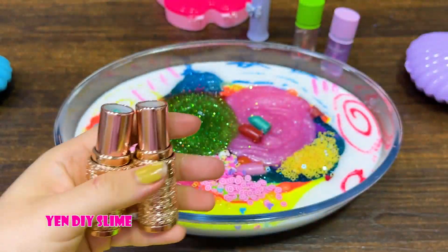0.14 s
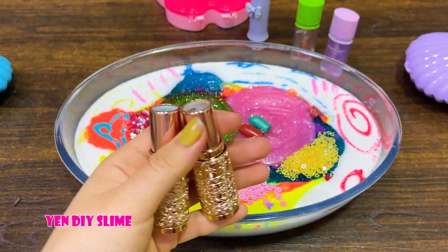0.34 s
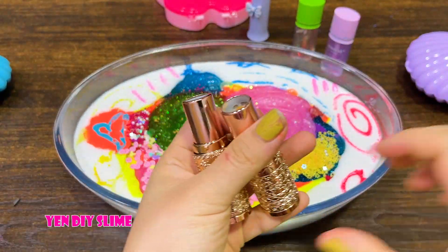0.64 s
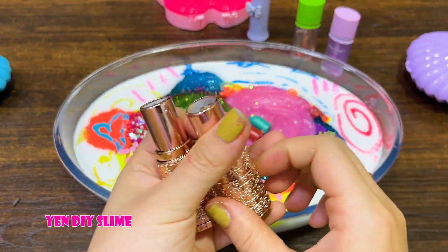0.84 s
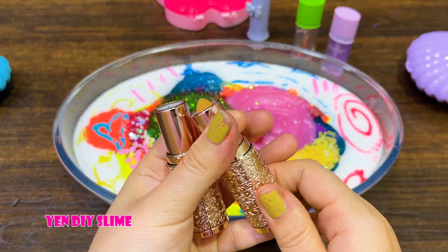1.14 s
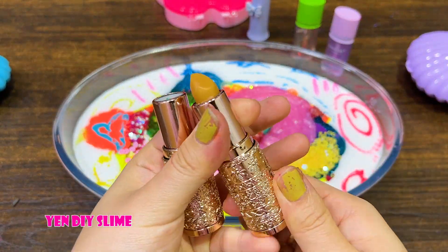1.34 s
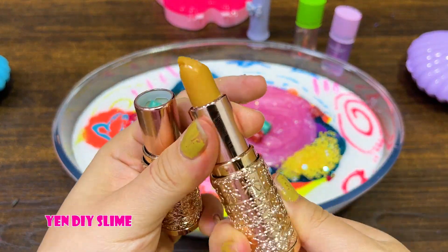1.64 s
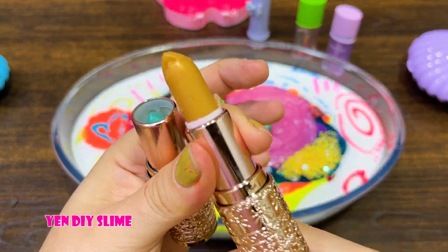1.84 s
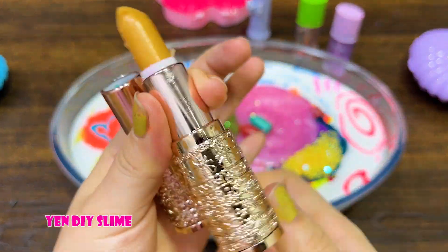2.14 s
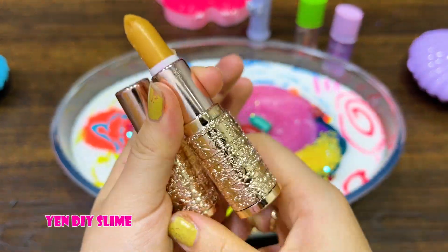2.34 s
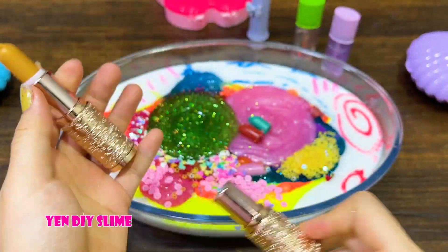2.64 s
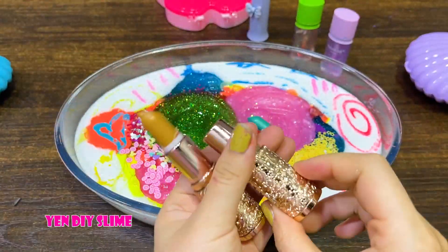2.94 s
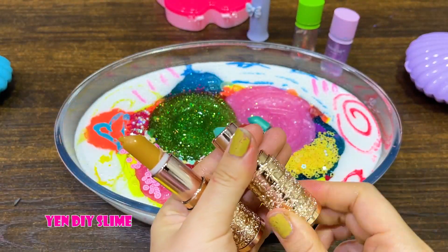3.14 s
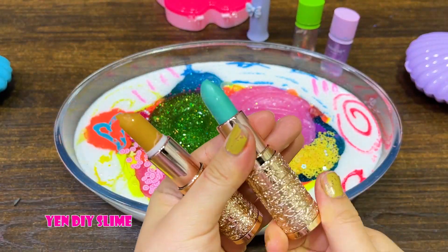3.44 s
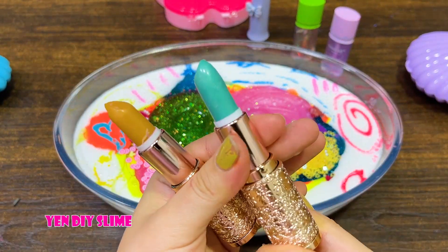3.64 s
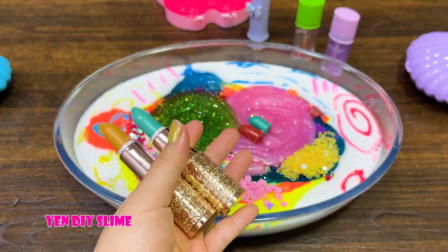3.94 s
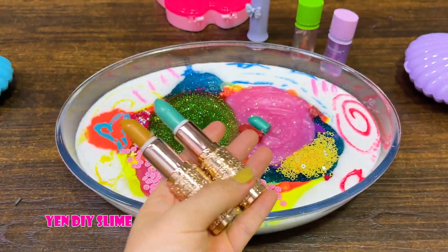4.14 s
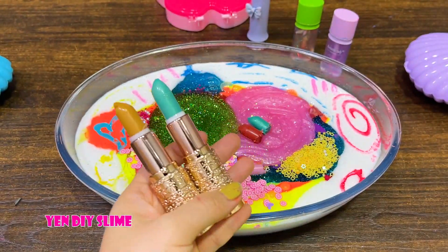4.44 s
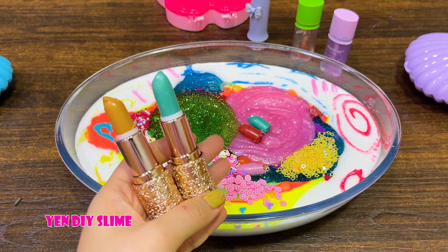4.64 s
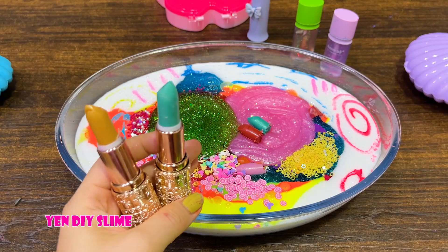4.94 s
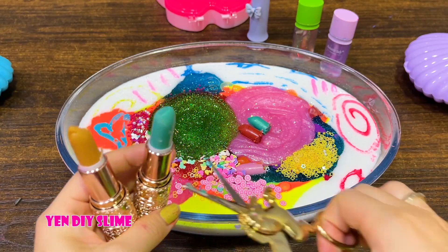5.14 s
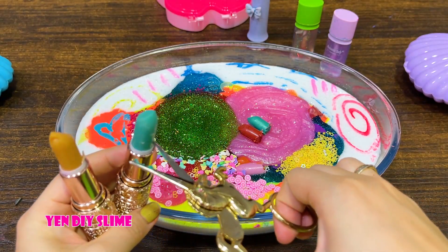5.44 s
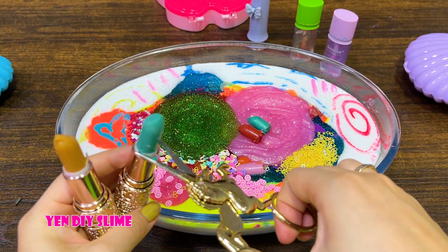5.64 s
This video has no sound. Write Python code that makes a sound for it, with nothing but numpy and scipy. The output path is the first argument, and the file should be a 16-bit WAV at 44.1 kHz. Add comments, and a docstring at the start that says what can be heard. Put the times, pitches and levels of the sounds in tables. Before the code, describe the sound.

Two metal lipstick cases knock together hard at once, then a cap clacks and rattles to rest on the table. Light ticks follow, a sleeve snaps, soft hissing twists and small clicks continue, then a burst of firmer ticks and a loud table bump. Scissor blades chatter briefly near the end. Close stereo microphone, small room, low fan hum with faint distant thumps.

```python
"""Lipstick tubes in the hands

Two metal lipstick tubes knock, clack, tick and rub close to a stereo microphone in a small room.
Each touch mixes fading tones, for the ringing metal, with short noise bursts, for the contact.
Sleeves snap with a sharp pulse and hiss as narrow bands of noise; scissors chatter on the table.
Behind them a fan (noise and two low tones) hums, and dull noise thumps repeat in threes far away."""
import sys
import numpy as np
from scipy import signal
from scipy.fft import rfft, irfft, next_fast_len
from scipy.io import wavfile
from scipy.ndimage import uniform_filter1d

SR = 44100
rng = np.random.default_rng(int(sys.argv[2]) if len(sys.argv) > 2 else 0)


def put_to_file(sound):
    """Save the sound as 16-bit audio at rate SR, in the file named by the first command-line argument."""
    columns = np.atleast_2d(sound).T  # one column per channel
    safe = np.clip(columns, -1, 1)
    whole_steps = np.round(safe * 32767)
    wavfile.write(sys.argv[1], SR, whole_steps.astype(np.int16))


N = 255780  # length of the scene in samples
T = np.arange(SR // 2) / SR  # time since a blow, in s
HZ = np.fft.rfftfreq(len(T), 1 / SR)  # the frequencies of such a short sound

# All levels are relative: each sound's function mixes and scales them.
# colour of the fan's rush, the steady hiss and its narrow high band: (f/Hz, level/dB)
AIR = [(42, -26.5), (58, -3.5), (110, -10.5), (200, -14.5), (450, -8), (510, -12.5), (630, 1.5),
       (740, -0.5), (870, -14.5), (1050, -33), (1500, -38), (5000, -61.5)]
HISS = [(100, 10), (900, 14), (1500, -0.5), (5500, -5), (14000, -5), (15500, -8), (16100, -28.5)]
WHINE = [(3000, -30), (6700, -21), (7500, -5), (8000, 1.5), (8500, -9), (10000, -26.5), (14000, -41)]
# steady tones of the fan: (f/Hz, level/dB)
HUM = [(156, -10.5), (313, -17)]
# the fan and far thumps are steady but for one dip, in which they keep sinking
FAN_DB, DIP_DB, DIP_SINK_DB_PER_S = -53.5, -6.5, -4.5
DIP_START_S, DIP_FALL_S, DIP_END_S, DIP_RETURN_S = 0.31, 0.051, 2.373, 0.29
# one group of far thumps: (delay/s, level/dB)
THUMP_GROUP = [(0, 5.5), (.092, 7), (.238, 4.5)]
FIRST_GROUP_S, GROUP_PERIOD_S = 1.583, 1.095
# colour of a far thump, also used for the boom under the cap: (f/Hz, level/dB)
FAR = [(30, -26), (80, -13.5), (150, -6), (228, 1), (275, -9.5), (330, -4.5), (500, -15), (1000, -25),
       (3000, -75.5)]

# how long the room's echo takes to fall by 60 dB: (f/Hz, t60/s)
ROOM_T60 = [(200, 0.58), (1000, 0.12), (2800, 0.2), (7000, 0.23), (15000, 0.17)]
# colour of the echo: (f/Hz, level/dB)
ROOM_TONE = [(200, -5), (600, -1.5), (1100, 4.5), (2200, 3), (4000, -2), (5000, -2.5), (8000, 2),
             (11000, 1.5), (15000, -2.5)]
# how alike left and right are in sound from all around: (f/Hz, likeness from -1 to 1)
ALIKE = [(100, 0.85), (700, .6), (1500, 0.32), (5000, 0.1), (9000, .6), (12500, 0.91)]
# how far the left microphone port leads the right: (f/Hz, phase/rad)
PORTS = [(300, -.3), (1200, -.5), (2200, .5), (3800, 1.25), (5800, .55), (7800, .75), (10000, .9),
         (11300, 0), (13350, -3.14), (15400, -6.28)]
TOP_HZ = 16250  # upper edge of the microphone

# metal bumps on the table: (t/s, crack level/dB, board level/dB)
BUMPS = [(4.4279, -34.5, -32.5), (4.468, -46.5, -41.5), (4.522, -57, -39), (4.595, -14.5, -24.5)]
# metal drags on the table, case slips on case: (start/s, end/s, gap/s)
DRAG_RUN = (4.44, 4.565, 0.012)
SLIP_RUN = (0.526, .69, 0.012)
DRAG_DB, SLIP_DB, RUN_FADE_DB_PER_S = -48.5, -51.5, -51  # levels at the start of a run, and their slope
SLIP_SCATTER_S, SLIP_SCATTER_DB, SLIP_RING_DB = 0.005, 4, 0

# scissor blades chatter: (t/s, level/dB)
SNIPS = [(5.1793, -25.5), (5.182, -30.5), (5.187, -33.5)]
# a sleeve hisses as it turns: (middle t/s, half length/s, level/dB)
TWISTS = [(1.272, 0.42, -75), (1.74, 0.17, -66.5), (2.189, 0.052, -61), (3.448, 0.57, -73.5)]
TWIST_HZ, TWIST_OCTAVES, RUB_OCTAVES = 13560, 0.24, .32  # octaves from the centre to half strength
# fingers and metal slide: (middle t/s, half length/s, level/dB, centre f/Hz)
RUBS = [(0.378, 0.069, -71, 5000), (2.225, 0.064, -76, 5200), (3.44, 0.13, -74, 5630),
        (3.858, 0.072, -72.5, 1725), (4.701, 0.069, -55.5, 4680), (4.95, 0.08, -72, 1814)]
# case touches case: (t/s, level/dB, ring level/dB)
TICKS = [(.3476, -46, -19), (.358, -40.5, -19), (.5475, -41, -5.5), (.5675, -38.5, -8), (.6075, -41, -3),
         (.6752, -47.5, -5), (.6952, -46, -3), (.7022, -45.5, 3), (.8624, -36, -12), (.8744, -38, -16),
         (1.6246, -44.5, -10), (2.365, -40, -22), (2.3835, -39.5, 4), (2.3875, -33.5, 1),
         (2.7646, -44, -12.5), (3.0979, -39, 4), (4.0803, -20, 1), (4.0888, -29, -1), (4.0924, -38, 3),
         (4.099, -22, -17), (4.1163, -21.5, -1), (4.1232, -34, 6), (4.374, -49.5, -9), (4.698, -28, -21),
         (4.785, -44.5, -14)]
TICK_PAN_DB, PAN_PER_RING_DB = 10.5, 0.67  # the tube's ring radiates to the left
# a sleeve snaps as it is twisted: (t/s, level/dB, upper edge f/Hz)
SNAPS = [(1.4148, -29, 16000), (1.525, -41, 2580), (1.982, -46, 2200), (2.324, -44.5, 9000)]
# a cap clacks and rattles to rest: (t/s, level/dB, ring tilt/dB per octave, room level/dB)
CLACKS = [(0.4187, -14.5, 1.5, -8.5), (0.4254, -12.5, 2, -9), (0.4322, -18.5, -0.5, -8.5),
          (0.4388, -18.5, 0.5, -8.5), (0.4441, -22, 1.5, -6.5), (.4635, -29.5, -2.5, -6)]
CAP_BOOM_DB = -43  # the table booms under the cap
# clear after-ring of the cap's modes below the top frequency
CAP_SING_DB, CAP_SING_T60, CAP_SING_TOP_HZ = -5, 0.12, 9000
# the cases knock together: (t/s, level/dB, low thud level/dB)
KNOCKS = [(0.011, -10.5, -14.5), (0.0215, -12, -11.5), (0.0233, -11.5, -2.5), (0.0308, -21.5, -8.5),
          (0.0376, -19.5, -11), (0.0437, -27, -4)]

# tones at which the scissors, tube, cap and cases ring: (f/Hz, level/dB, t60/s)
BLADES = [(2845, -19.5, 0.018), (4440, -28, 0.097), (7940, -15, 0.018), (11800, -10, 0.023),
          (14366, 2.5, 0.037)]
TUBE = [(5380, 0, .009), (6820, 1, .0085), (9880, -14, .006), (14400, -6, .006)]
CAP = [(1696, -5, 0.028), (2020, -8, 0.02), (2222, 0.5, 0.025), (2595, -3, 0.022), (2854, -4.5, 0.022),
       (3115, -1.5, .026), (3560, -4.5, .02), (3880, 0, 0.023), (4317, -9.5, 0.019), (6183, -13.5, .02),
       (7967, -11.5, 0.016), (10730, -9.5, .014)]
CASES = [(1047, -5, 0.0063), (1606, -2.5, 0.013), (2450, -9.5, 0.008), (4208, -5, 0.009), (6000, -13, .012),
         (10600, -4, 0.028), (12440, -5, 0.0053), (14570, 1, 0.006)]
# colour of the table board, a sleeve's snap, a bare metal contact and a near thud: (f/Hz, level/dB)
TABLE = [(250, -12.5), (590, 12), (1050, -6), (1800, 5), (3000, 3), (5500, 1), (14000, -49)]
SNAP = [(600, -15), (2200, -9.5), (3300, 4.5), (5600, 4.5), (7500, -9.5), (11000, -8.5), (15000, 0.5)]
CRACK = [(100, -21.5), (550, 6), (1100, -11.5), (2200, -5.5), (4200, -3), (5600, 2), (8000, 2.5),
         (11500, 0.5), (14500, 9.5), (16500, -5)]
THUD = [(100, -7), (300, -0.5), (480, 0.5), (750, -5.5), (1200, -22), (4000, -72.5)]


def amp(db):
    """Turn decibels into a multiplier."""
    return 10 ** (np.asarray(db) / 20)


def unit(x):
    """Scale a sound to an average strength (rms) of 1."""
    return x / np.sqrt(np.mean(x ** 2) + 1e-20)


def blow(x):
    """Scale a short sound to the energy of one millisecond at rms 1."""
    return x / np.sqrt(np.sum(x ** 2) * 1000 / SR + 1e-20)


def along(points, hz):
    """Read a curve of (frequency, value) points on a log frequency axis."""
    f, v = np.transpose(points)
    return np.interp(np.log(hz + 1), np.log(f + 1), v)


def filtered(x, response):
    """Multiply each frequency of x by a given response."""
    n = x.shape[-1]
    m = next_fast_len(n + SR // 8)  # spare room, so the end does not wrap onto the start
    return irfft(rfft(x, m) * response(np.fft.rfftfreq(m, 1 / SR)), m)[..., :n]


def above(x, low_hz):
    """Weaken what lies below low_hz."""
    return signal.sosfilt(signal.butter(3, low_hz, "highpass", fs=SR, output="sos"), x)


def below(x, top_hz):
    """Weaken what lies above top_hz."""
    return signal.sosfilt(signal.butter(3, min(top_hz, .45 * SR), fs=SR, output="sos"), x)


def noise(spectrum, size):
    """Coloured noise of rms 1."""
    return unit(filtered(rng.standard_normal(size), lambda hz: amp(along(spectrum, hz))))


def diffuse(spectrum, size):
    """Stereo noise from all around, its left-right likeness changing with frequency."""
    def likeness(hz):
        return np.clip(along(ALIKE, hz), -1, 1)

    mid = filtered(noise(spectrum, size), lambda hz: np.sqrt(1 + likeness(hz)))
    side = filtered(noise(spectrum, size), lambda hz: np.sqrt(1 - likeness(hz)))
    return unit(np.array([mid + side, mid - side]))


def fade(t60, attack=0.0001):
    """A blow's rise and fall: it drops 60 dB every t60 seconds; attack (s) sets the rise."""
    return amp(-60 * T / t60) * (1 - np.exp(-T / attack))


def causal(gain):
    """The response with this gain that never sounds before its cause."""
    cepstrum = irfft(np.log(gain))
    return np.exp(rfft(2 * cepstrum[:len(T) // 2], len(T)))


def click(spectrum):
    """One clean, sudden pulse with the given spectrum."""
    return blow(irfft(causal(amp(along(spectrum, HZ)))))


def burst(spectrum, t60, tilt_db=0):
    """A dying noise burst that keeps evenly to its spectrum, tilted per octave above 1500 Hz."""
    raw = rfft(rng.standard_normal(len(T)) * fade(t60))
    ripple = np.sqrt(uniform_filter1d(np.abs(raw) ** 2, size=300))
    colour = amp(along(spectrum, HZ) + tilt_db * np.log2(np.maximum(HZ, 1500)))
    return blow(irfft(raw * causal(colour / ripple)))


def crack(t60, tilt_db=0, low_hz=300):
    """The broad burst of a metal contact; a light part gives off little below low_hz."""
    return blow(above(burst(CRACK, t60, tilt_db), low_hz))


def ring(modes, spread=.05, count=8):
    """Each resonance is one partial or a cluster of close ones, detuned at random by spread."""
    hz, db, t60 = np.transpose(modes)
    detune, phase = rng.standard_normal((2, count, len(hz), 1))
    t = T[T < 2 * t60.max()]
    partials = np.sin(2 * np.pi * (hz[:, None] * (1 + spread * detune) * t + phase)).sum(0)
    sound = np.zeros(len(t))
    for x, level, life in zip(partials, db, t60):
        # a longer-lived mode also carries more energy
        sound += amp(level) * blow(x * fade(life)[:len(t)]) * np.sqrt(life)
    return blow(np.pad(sound, (0, len(T) - len(t))))


def slips(start, end, gap, db):
    """An uneven, fading run of small contacts: rows of (t/s, level/dB)."""
    times = np.arange(start, end, gap)
    chance = rng.standard_normal((len(times), 2))
    rows = []
    for s, (late, hard) in zip(times, chance):
        level_db = db + RUN_FADE_DB_PER_S * (s - start) + SLIP_SCATTER_DB * hard
        rows.append((s + SLIP_SCATTER_S * late, level_db))
    return rows


def slide(half_length, centre_hz, octaves):
    """A swell of tiny slips in one band, catching and letting go every few milliseconds."""
    size = int(2 * half_length * SR)
    grip = unit(filtered(rng.standard_normal(size), lambda hz: hz < 200))
    friction = rng.standard_normal(size) * amp(3.5 * np.minimum(grip, 2))
    band = filtered(friction, lambda hz: 1 / (1 + (np.log2((hz + 1) / centre_hz) / octaves) ** 2))
    return unit(band) * np.hanning(size) ** 2


def room(x, room_db, pan_db=0):
    """Direct sound, quick echoes off near surfaces, and a tail that builds up as the walls answer."""
    hz, t, z = signal.stft(diffuse([(100, 0)], len(T)), SR, nperseg=256)
    decay = amp(-60 * t / along(ROOM_T60, hz)[:, None])
    tail = signal.istft(z * decay, SR, nperseg=256)[1][:, :len(T)]
    tail = tail * (1 - np.exp(-T / .009))
    tail = filtered(tail / np.linalg.norm(tail[0]), lambda hz: amp(along(ROOM_TONE, hz)))
    # small surfaces return mostly treble
    near = above(diffuse([(100, 0)], len(T)) * fade(t60=.005), low_hz=1900)
    near = near / np.linalg.norm(near, axis=1, keepdims=True)
    echoes = amp(room_db) * tail + amp(-10.5) * near
    direct = x * amp([[pan_db / 2], [-pan_db / 2]])  # positive pan leans left
    return direct + signal.fftconvolve(x[None], echoes, axes=1)[:, :len(T)]


def add(out, s, x):
    """Mix x in at time s."""
    start = max(round(s * SR), 0)
    part = x[..., :N - start]
    out[:, start:start + part.shape[-1]] += part


def far_thumps():
    """The same three short, low booms return at a steady pace."""
    out = np.zeros((2, N))
    for s in np.arange(FIRST_GROUP_S, N / SR - THUMP_GROUP[-1][0], GROUP_PERIOD_S):
        for delay, db in THUMP_GROUP:
            add(out, s + delay, amp(db + 3) * diffuse(FAR, len(T)) * fade(t60=0.4, attack=0.0098))
    return out


def background():
    """The fan's rush and hum and the far thumps dip together, over a steady hiss with a high band."""
    t = np.arange(N) / SR
    # slow wander in the hum's pitch
    drift = np.cumsum(filtered(rng.standard_normal(N), lambda hz: hz < 4)) / SR
    hum = sum(amp(db) * np.sqrt(2) * np.sin(2 * np.pi * hz * (t + .6 * drift)) for hz, db in HUM)
    fan = amp(1.5) * diffuse(AIR, N) + hum
    falling = (t - DIP_START_S) / DIP_FALL_S
    returning = (DIP_END_S - t) / DIP_RETURN_S
    dip = np.clip(np.minimum(falling, returning), 0, 1)
    level_db = FAN_DB + dip * (DIP_DB + DIP_SINK_DB_PER_S * (t - DIP_START_S))
    hiss = amp(-69.5) * diffuse(HISS, N) + amp(-72.5) * noise(WHINE, N)
    return amp(level_db) * (fan + far_thumps()) + hiss


def table():
    """Metal bumps on and drags across the table: sharp cracks on the bumps, a duller board for both."""
    def board():
        return room(burst(TABLE, t60=0.033), room_db=0.0)

    out = np.zeros((2, N))
    for s, crack_db, board_db in BUMPS:
        metal = room(crack(t60=0.0055, tilt_db=-0.5, low_hz=1830), room_db=-7.5, pan_db=2.0)
        add(out, s, amp(crack_db) * metal + amp(board_db) * board())
    for s, db in slips(*DRAG_RUN, DRAG_DB):
        add(out, s, amp(db) * board())
    return out


def scissors():
    """The blades chatter with a very high, short ring."""
    out = np.zeros((2, N))
    for s, db in SNIPS:
        contact = amp(-15.5) * crack(t60=0.031, low_hz=2500)
        add(out, s, amp(db) * room(ring(BLADES, spread=0.034) + contact, room_db=-14.0))
    return out


def rubs():
    """Turning sleeves all hiss in the same high band; fingers and metal rub lower."""
    out = np.zeros((2, N))
    for s, half_length, db in TWISTS:
        add(out, s - half_length, amp(db) * slide(half_length, TWIST_HZ, TWIST_OCTAVES))
    for s, half_length, db, centre_hz in RUBS:
        add(out, s - half_length, amp(db) * slide(half_length, centre_hz, RUB_OCTAVES))
    return out


def ticks(contacts):
    """Light contacts ring the hand-damped tube; firmer ones are brighter and wake the case's low modes."""
    out = np.zeros((2, N))
    for s, db, ring_db in contacts:
        force_db = db + 20.0
        contact = crack(t60=0.0058, tilt_db=3.5 + .06 * force_db, low_hz=1500)
        tick = blow(amp(ring_db + 6.0) * ring(TUBE, spread=0.024) + contact)
        body = amp(-13.5 + 0.49 * force_db) * blow(below(ring(CASES, spread=.25), top_hz=2200))
        pan_db = TICK_PAN_DB + PAN_PER_RING_DB * ring_db
        both = room(tick, room_db=-11.5, pan_db=pan_db) + room(body, room_db=-6.0)
        add(out, s, amp(db - 7.0) * both)
    return out


def snaps():
    """A sleeve lets go in a dry pulse and a bright crack in the room; soft ones have less treble."""
    out = np.zeros((2, N))
    for s, db, top_hz in SNAPS:
        pulse = room(click(SNAP), room_db=-13.5, pan_db=2.5)
        bright = room(crack(t60=0.004, tilt_db=3, low_hz=3020), room_db=-6)
        add(out, s, amp(db) * below(pulse + amp(-4) * bright, top_hz))
    return out


def caps():
    """A loose cap clacks and rattles, its modes sing on, and the table booms under it."""
    out = np.zeros((2, N))
    for s, db, tilt_db, room_db in CLACKS:
        modes = [(hz, level + tilt_db * np.log2(hz / CAP[0][0]), t60) for hz, level, t60 in CAP]
        lower = [(hz, level, CAP_SING_T60) for hz, level, _ in modes if hz < CAP_SING_TOP_HZ]
        singing = amp(CAP_SING_DB) * ring(lower, spread=0, count=1)
        rattle = below(crack(t60=0.05, tilt_db=-6.5, low_hz=1711), top_hz=3800)
        contact = amp(-7.5) * crack(t60=0.013) + amp(-10) * rattle
        add(out, s, amp(db) * room(ring(modes, spread=0.028) + singing + contact, room_db))
    boom = diffuse(FAR, len(T)) * fade(t60=0.51, attack=0.00359)
    add(out, CLACKS[1][0], amp(CAP_BOOM_DB) * boom)  # starts with the second clack
    return out


def knocks():
    """Hard knocks of the cases, with a thud from the weight behind them."""
    out = np.zeros((2, N))
    for s, db, thud_db in KNOCKS:
        metal = amp(-0.5) * ring(CASES, spread=.055) + amp(-4.0) * crack(t60=.016)
        thud = above(burst(THUD, t60=0.018), low_hz=80)
        add(out, s, amp(db) * room(metal + amp(thud_db) * thud, room_db=-14.5, pan_db=1.5))
    return out


def scene():
    """Everything the hands do, over the room's background."""
    case_slips = [(s, db, SLIP_RING_DB) for s, db in slips(*SLIP_RUN, SLIP_DB)]
    hands = table() + scissors() + rubs() + ticks(TICKS) + ticks(case_slips)
    return background() + hands + snaps() + caps() + knocks()


def record(dry):
    """Two microphone ports differ in phase; hard peaks are rounded, deep bass and top treble cut."""
    sides = np.array([[1], [-1]])
    pair = filtered(dry, lambda hz: np.exp(.5j * along(PORTS, hz) * sides))
    pair = pair / (1 + np.abs(pair / .8) ** 6) ** (1 / 6)
    return filtered(pair, lambda hz: 1 / np.sqrt((1 + (48 / (hz + 1)) ** 8) * (1 + (hz / TOP_HZ) ** 200)))


dry = scene()
out = record(dry)
put_to_file(out)
```